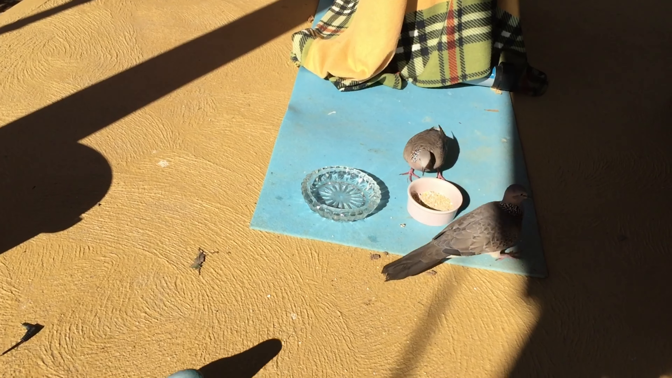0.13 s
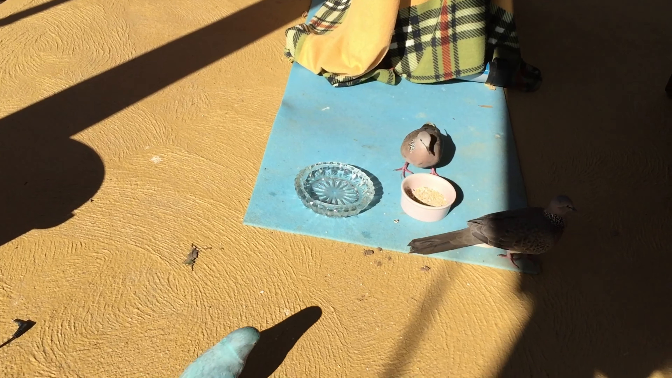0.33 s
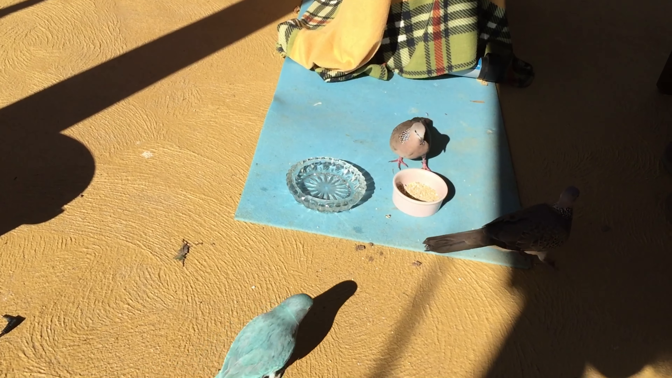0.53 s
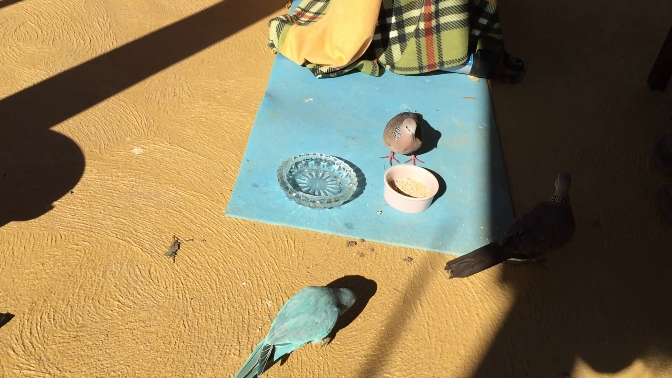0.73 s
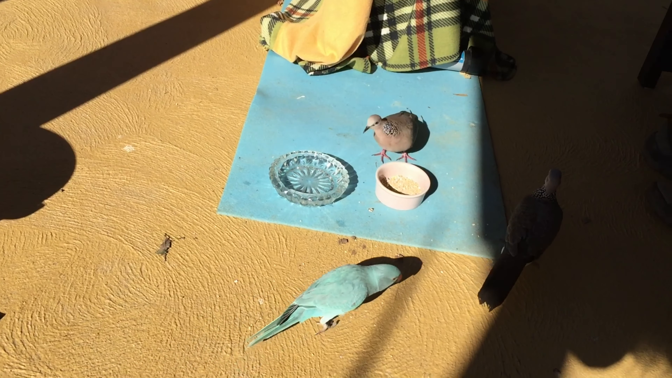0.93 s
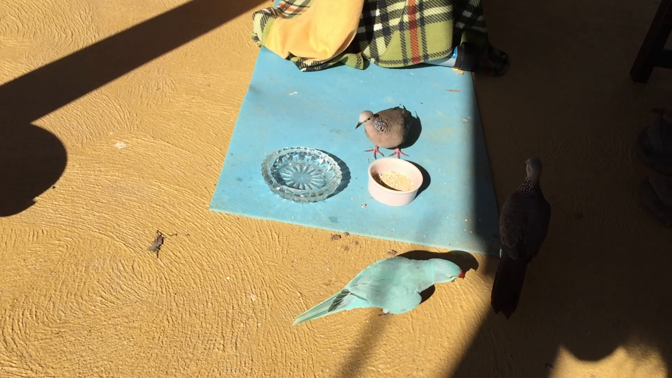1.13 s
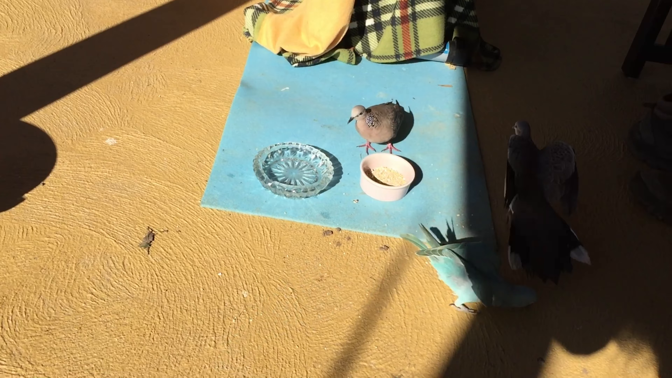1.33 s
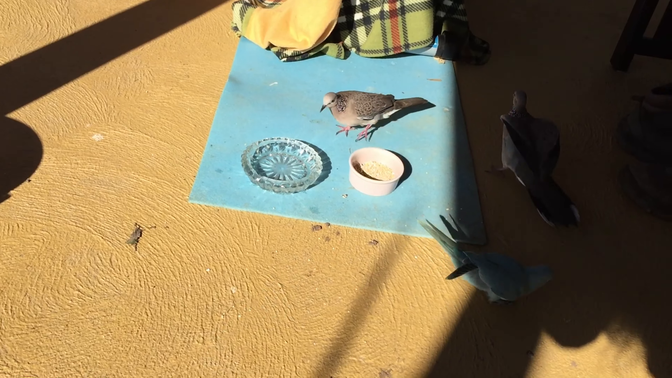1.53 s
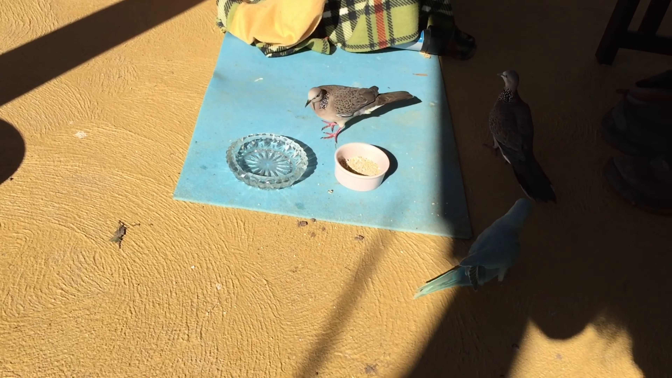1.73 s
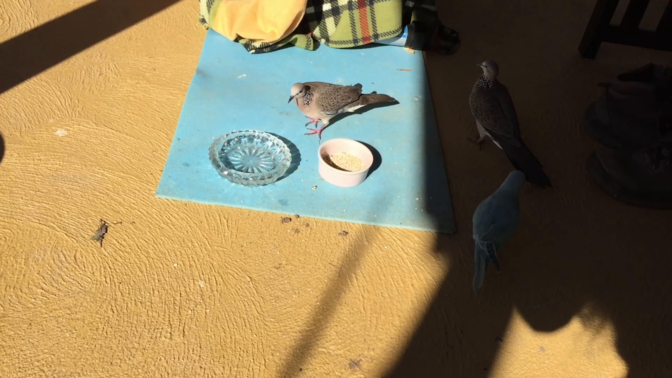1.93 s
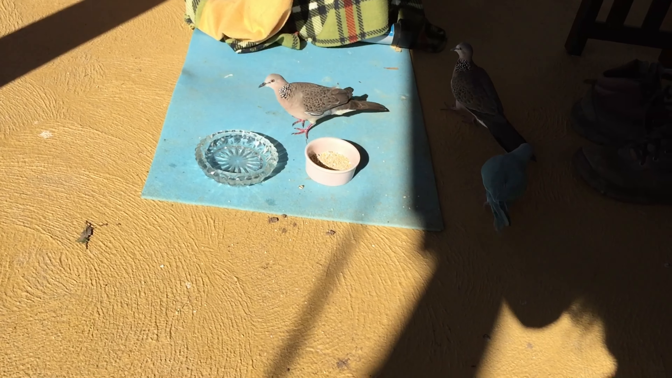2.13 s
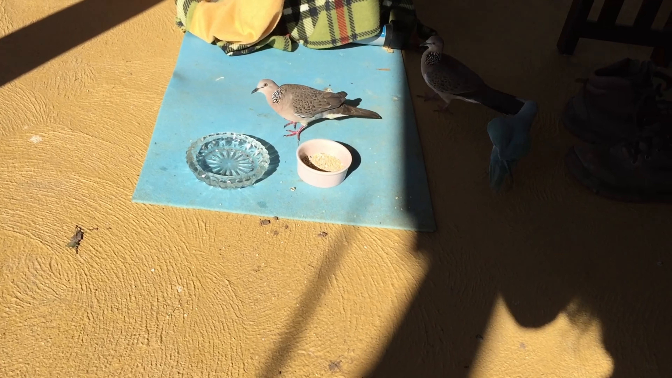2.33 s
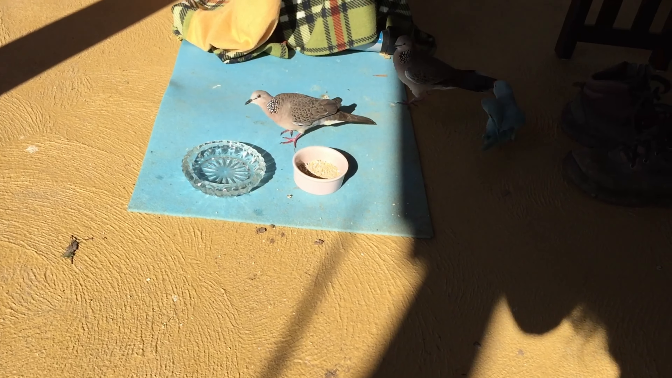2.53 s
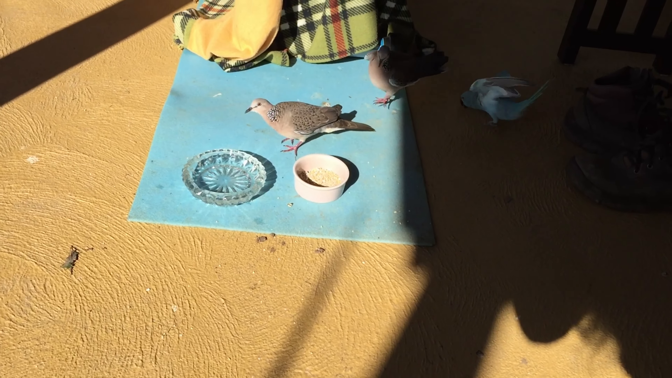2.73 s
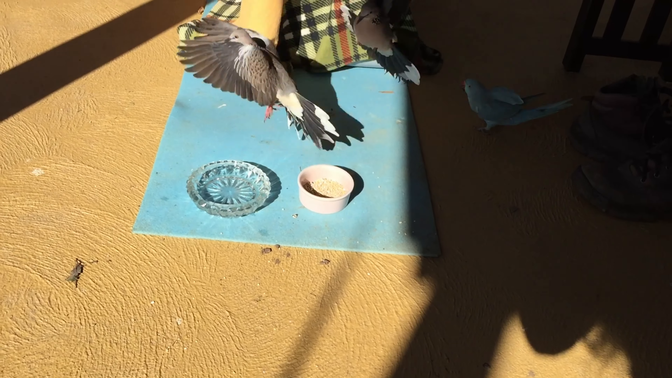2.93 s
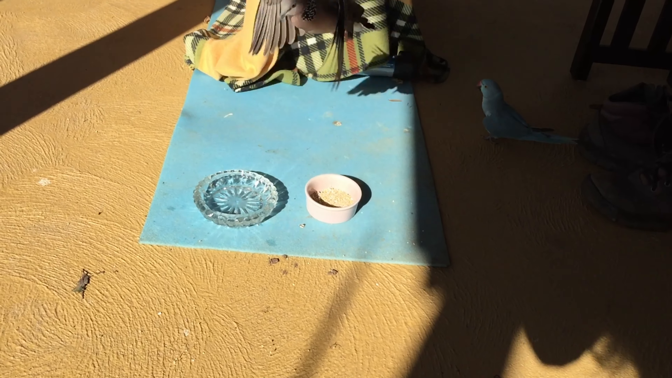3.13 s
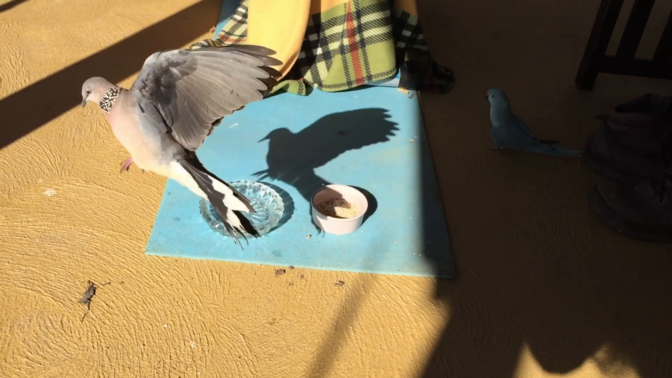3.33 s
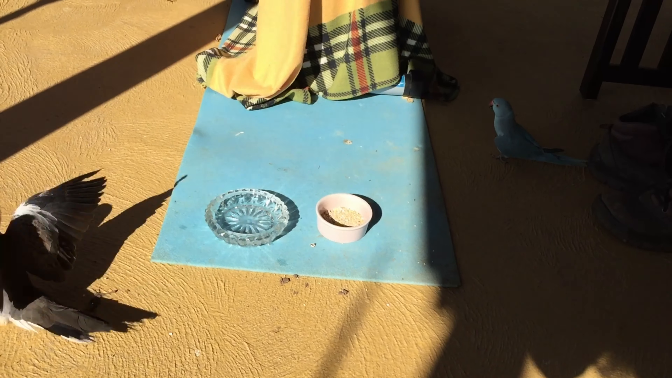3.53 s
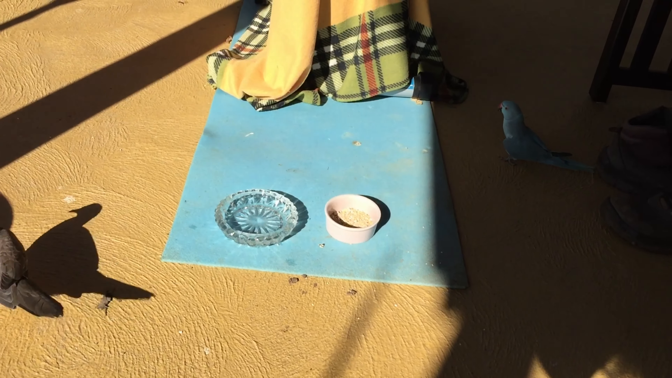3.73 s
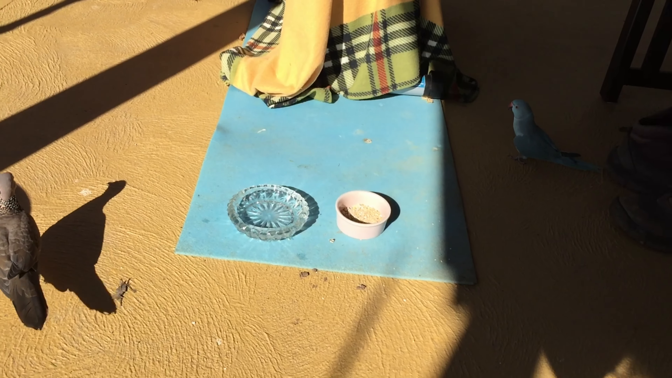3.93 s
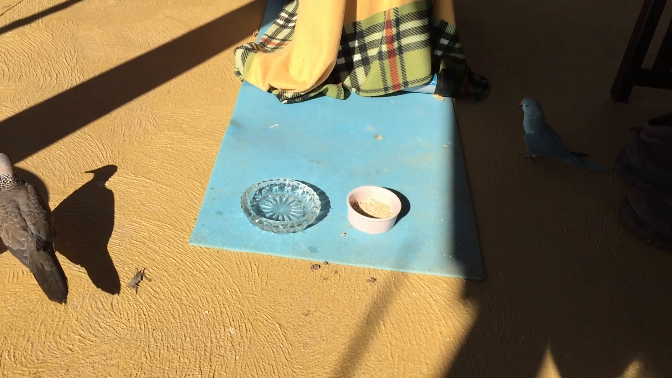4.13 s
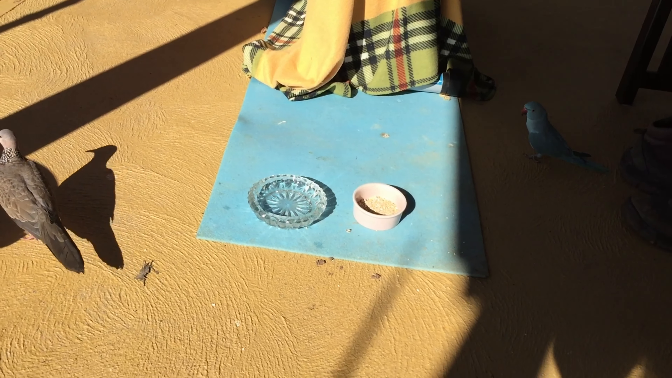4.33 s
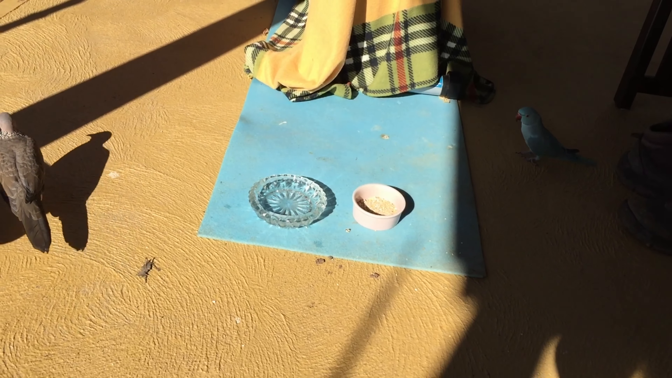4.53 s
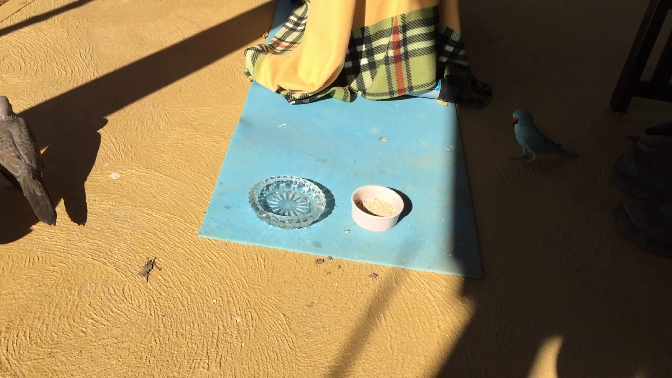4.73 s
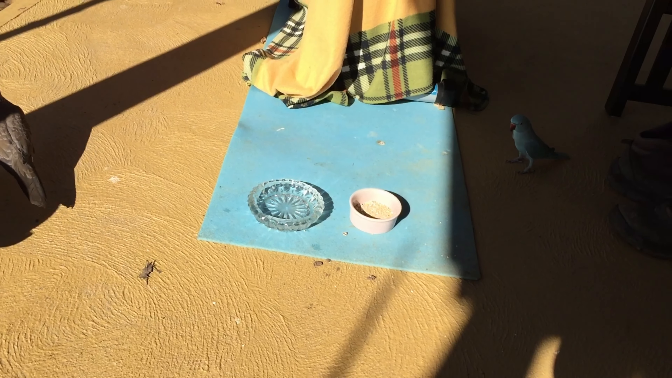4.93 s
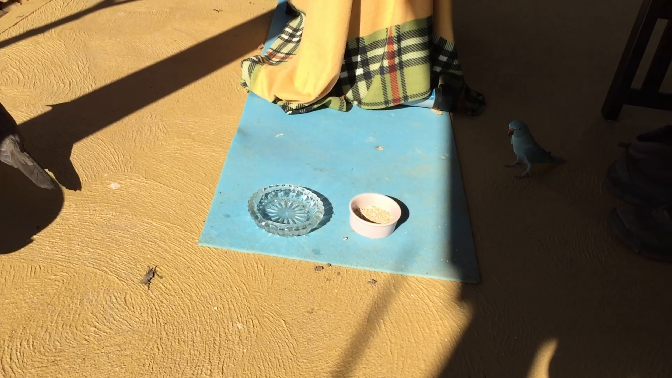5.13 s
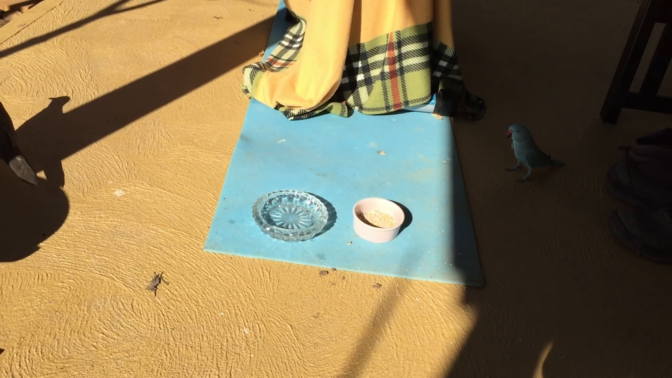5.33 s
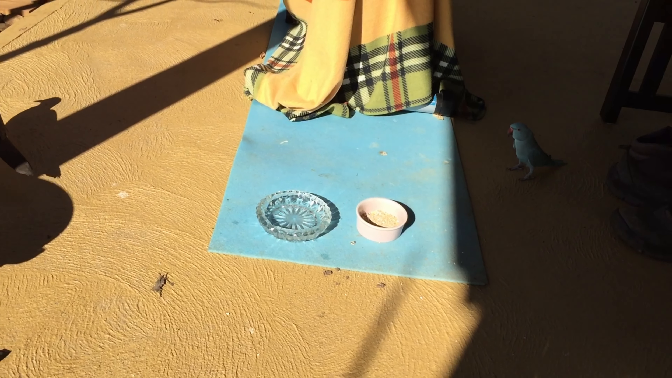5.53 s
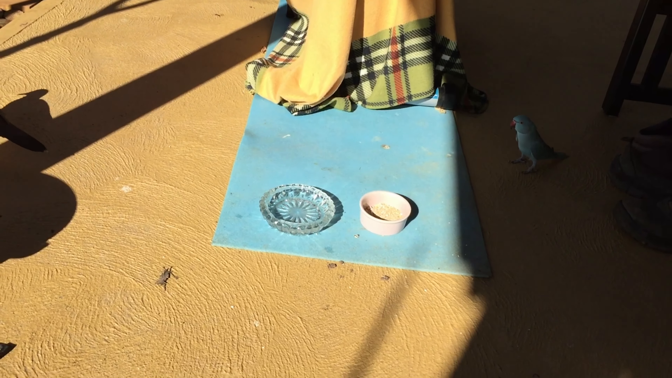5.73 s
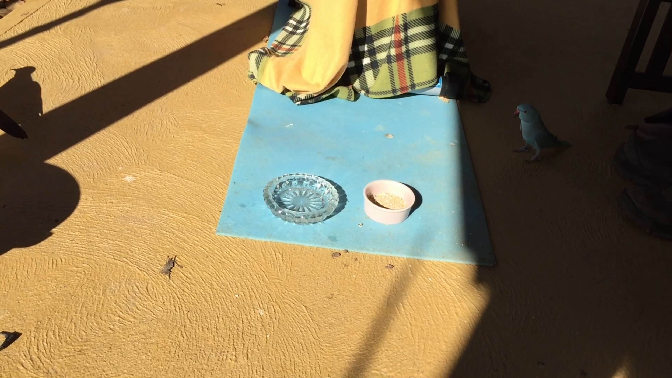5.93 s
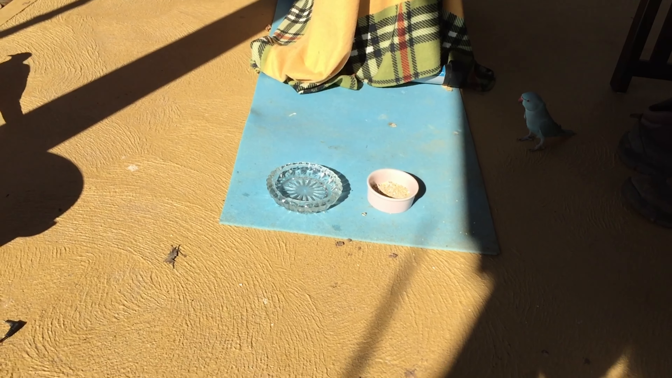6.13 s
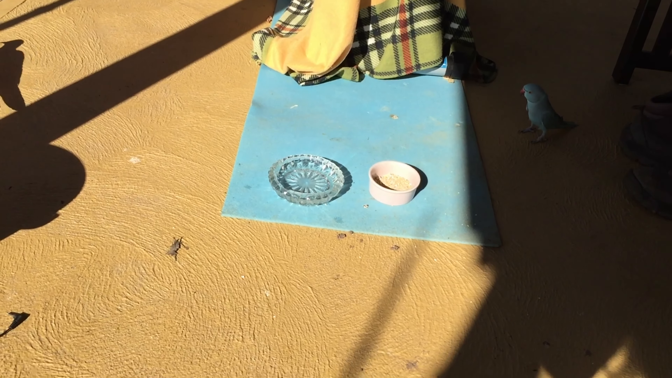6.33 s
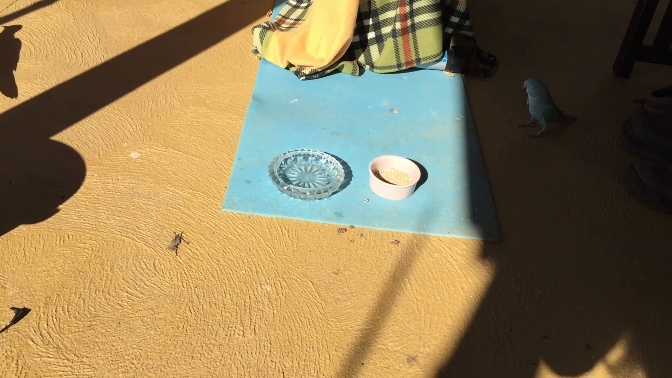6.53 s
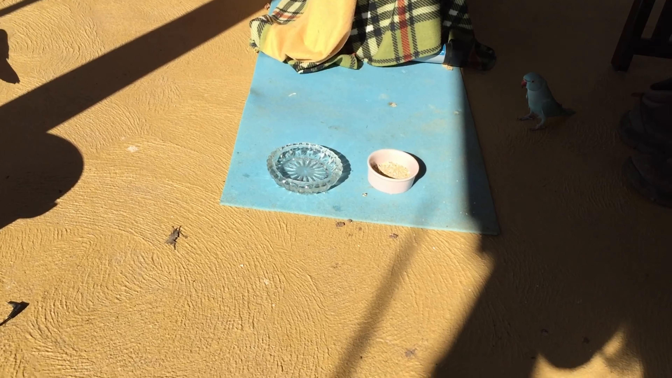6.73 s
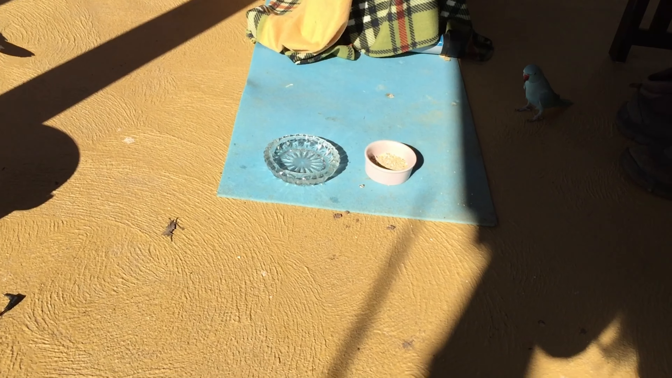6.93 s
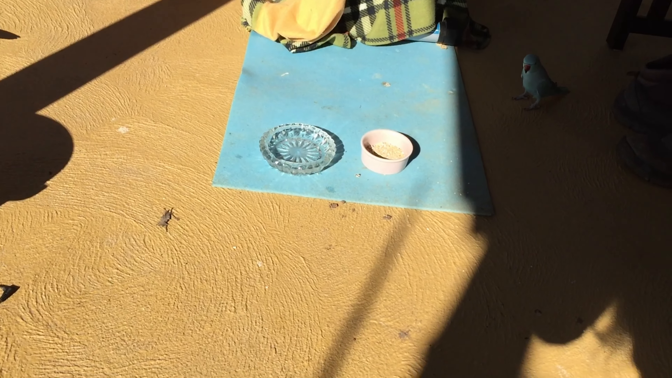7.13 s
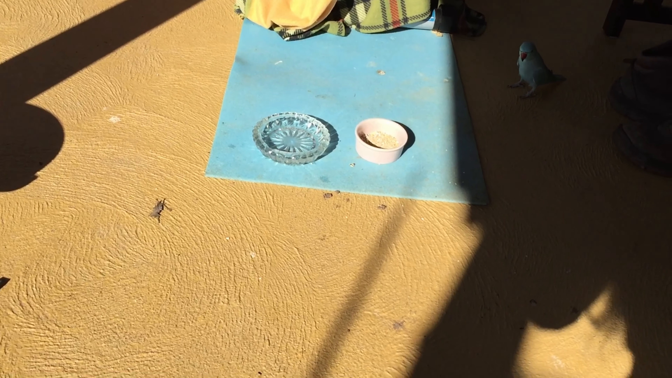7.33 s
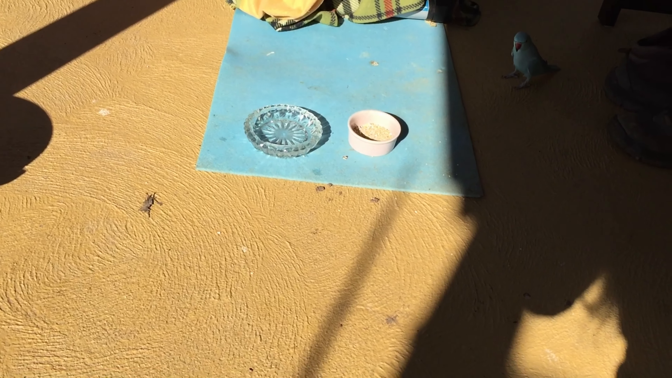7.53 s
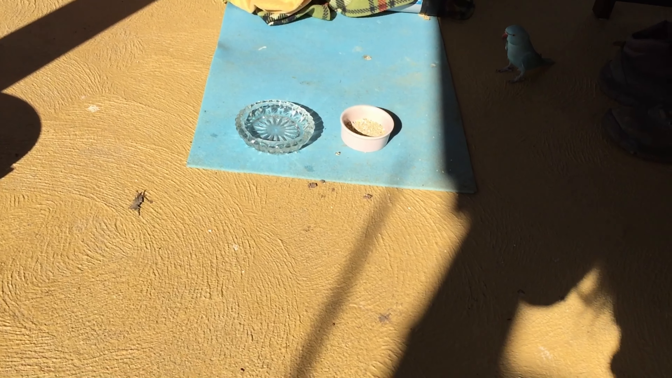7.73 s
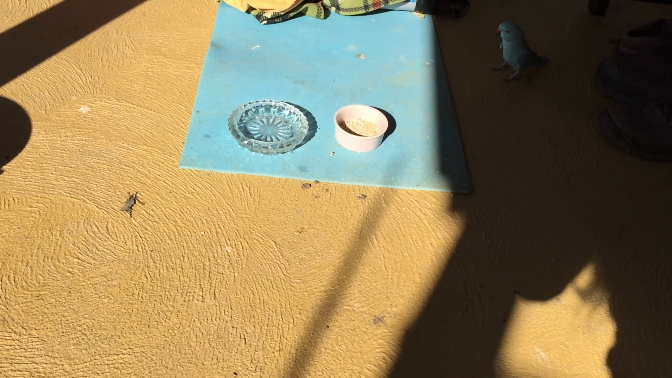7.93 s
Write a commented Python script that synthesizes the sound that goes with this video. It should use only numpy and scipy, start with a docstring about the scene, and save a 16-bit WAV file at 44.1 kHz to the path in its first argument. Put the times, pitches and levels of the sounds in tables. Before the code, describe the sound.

Quiet patio with distant traffic rumble and soft claw ticks; a wing flick, then loud slapping dove wings, a landing, and tiny far birds.

```python
"""A low rumble of distant traffic under the hiss of open air: shaped noise, heard from the first moment.
Over it, doves shuffle and tick at a feeding bowl on a walled backyard patio: swelling noise, gritty bursts.
Small birds chirp far off in narrow bands of noise. One dove flicks its wings, then two burst up with a
clatter of slaps, snaps, air puffs and gliding tones; one lands nearby and settles its feathers.
Discrete echoes and a diffuse tail add the walls."""
import sys
import numpy as np
from scipy import signal
from scipy.fft import rfft, irfft
from scipy.io import wavfile
from scipy.ndimage import uniform_filter1d

SR = 44100
rng = np.random.default_rng(int(sys.argv[2]) if len(sys.argv) > 2 else 0)


def dump_mix(stems):
    """Bounce the given channels to the path in sys.argv[1] as a 16-bit WAV at rate SR."""
    frames = np.atleast_2d(stems).T  # one column per channel
    limited = np.clip(frames, -1, 1)  # hard clip at full scale
    pcm = np.round(limited * 32767).astype(np.int16)
    wavfile.write(sys.argv[1], SR, pcm)


N = 356107
TIME = np.arange(N) / SR

# Spectrum of the traffic rumble: (frequency [Hz], relative level [dB])
RUMBLE_SPECTRUM = [(12, -71), (20, -31), (27, -49), (35, -26), (45, -7.5), (70, -1.5), (88, -4), (125, -10),
                   (189, -18.5), (239, -24.5), (400, -37.5), (520, -53), (880, -120)]
# Mean course of the traffic: (time [s], level [dB])
RUMBLE_LEVEL = [(0, -44.5), (.7, -43.5), (1.05, -45.5), (2.3, -45), (3.3, -42.5), (4.6, -45), (7.1, -43.5),
                (7.75, -49.5), (8.07, -46)]
# Spectrum of the hiss of open air: (frequency [Hz], relative level [dB])
AIR_SPECTRUM = [(100, -4.5), (250, 2), (400, 2), (620, -1), (950, 2.5), (1300, -4.5), (1700, -3.5),
                (2600, -10.5), (4000, -16.5), (7000, -20), (9200, -24.5), (10400, -30), (12000, -24),
                (16000, -27.5)]
# Course of the open air, easing toward the end: (time [s], level [dB])
AIR_LEVEL = [(0, -56), (5.5, -56.5), (8.07, -59)]
# Soft shuffle of the walking birds: (time [s], level [dB])
SHUFFLE_LEVEL = [(0, -66.5), (1.3, -57), (2.05, -56.5), (2.9, -51), (3.7, -56.5), (3.95, -47),
                 (4.17, -61.5), (5.2, -63.5)]
# Fine rustle of their feathers: (time [s], level [dB])
PREEN_LEVEL = [(.3, -62.5), (1.25, -69.5), (1.549, -60.5), (2.05, -74.5), (2.7, -64.5), (3.4, -52),
               (4.5, -68.5), (8.07, -67)]
# Wing beats and feather flicks: (peak time [s], fall [s], swish of air [dB], rustle of feathers [dB])
STROKES = [(0.058, 0.012, -68, -36), (1.475, 0.05, -47, -41.5), (1.591, 0.042, -38, -64),
           (2.405, 0.064, -40, -73), (2.987, 0.046, -42.5, -39.5), (3.058, 0.028, -23.5, -28),
           (3.154, 0.035, -26, -25.5), (3.233, 0.036, -33, -34), (3.359, 0.04, -41, -41.5),
           (3.395, 0.018, -38.5, -42.5), (3.508, 0.091, -50, -57.5), (3.632, 0.019, -41.5, -44.5),
           (3.9, 0.058, -63, -64), (4.083, 0.026, -40.5, -55.5), (4.8, .04, -53, -58.5),
           (7.908, 0.013, -65, -45.5)]
# Spectrum of air swept by a wing: (frequency [Hz], relative level [dB])
SWISH_SPECTRUM = [(60, -35.5), (150, -5), (330, -8), (520, -9), (750, -5), (1150, -4.5), (1700, -8),
                  (2400, -16.5), (3200, -24.5), (6000, -29.5), (16000, -47)]
# Spectrum of feathers rubbing: (frequency [Hz], relative level [dB])
RUSTLE_SPECTRUM = [(300, -52), (1500, -4), (2450, 5.5), (2850, 2), (3500, 2), (5000, -0.5), (7000, -1.5),
                   (9000, -2), (10400, -6.5), (11800, -4.5), (16000, -12)]
# Clearest claw and beak strikes:
# (time [s], level [dB], centre [Hz], decay [s], width as ratio of band edge to centre [1])
TICKS = [(.159, -40.5, 5500, 0.0061, 1.35), (.314, -48, 6070, 0.0079, 1.28),
         (.555, -41.5, 4160, .0048, 1.27), (0.889, -50.5, 6260, .009, 1.27),
         (.951, -53.5, 4180, 0.012, 1.1), (1.7875, -40, 4200, 0.0046, 1.3),
         (2.612, -36, 6250, 0.0062, 1.58), (2.761, -37, 4200, 0.011, 1.23),
         (2.8628, -39.5, 4000, 0.0024, 3.6), (2.941, -31, 4500, 0.0043, 1.2), (3.488, -44, 4400, 0.0025, 1),
         (3.941, -41, 4000, 0.0053, 2.3), (4.147, -42.5, 8200, .0065, 1.4), (4.332, -54, 10000, .003, 1.4),
         (7.617, -47.5, 6500, 0.0054, 1.37), (7.906, -38.5, 7050, 0.0042, 1.22)]
# Nearest of the far small birds: (time [s], level [dB], pitch [Hz])
CHIRPS = [(.735, -59, 3000), (1.134, -52, 2150), (2.593, -55, 2800), (4.602, -54, 2050),
          (5.237, -54.5, 2410), (5.343, -57, 3980), (5.617, -53, 3390), (5.779, -48, 2720),
          (6.008, -58, 5150), (6.398, -53, 2650), (6.74, -55, 2270), (6.776, -48, 2670),
          (6.92, -54.5, 4980), (7.069, -52.5, 2570), (7.43, -59, 6000), (7.574, -58, 2440),
          (7.875, -55, 3380), (7.898, -54, 2260)]
# Feathers and tails sliding past each other: (peak time [s], level [dB], centre [Hz], fall [s])
SLIDES = [(.19, -53, 4700, 0.046), (.208, -48, 11200, .018), (0.482, -47.5, 6100, 0.0096),
          (.52, -56.5, 4500, 0.1), (.72, -59.5, 4230, 0.034), (1.552, -38, 4800, 0.0077),
          (1.587, -36, 2490, 0.022), (1.594, -42, 4160, 0.017), (1.679, -48.5, 4150, 0.018),
          (2.19, -56, 3730, .025), (2.41, -46, 1520, 0.015), (3.0, -43, 4950, 0.029),
          (3.064, -31, 1590, 0.015), (3.15, -26, 1690, 0.011), (4.079, -43.5, 1250, 0.013)]
# Wing tips striking: (time [s], level of first quill [dB], quills that meet [count], brightness [0-1])
CLAPS = [(1.4617, -16.5, 2, 0.28), (1.4938, -34, 2, 0.3), (1.588, -26.5, 2, 0), (2.397, -34, 2, 0.16),
         (2.984, -32, 2, 0.35), (3.0444, -22, 2, 0.7), (3.065, -13, 2, 0.67), (3.1297, -8.5, 3, 0.7),
         (3.1324, -4.5, 3, 1), (3.166, -30, 2, 0.8)]
# Air pushed onto the microphone: (time [s], level [dB], frequency [Hz])
PUFFS = [(3.063, -16.5, 290), (3.1657, -18, 216), (3.171, -21, 84), (3.185, -25.5, 130)]
# Stiff flight feathers singing on a downstroke:
# (peak time [s], level [dB], pitch [Hz], half length [s])
WHISTLES = [(3.072, -21.5, 1150, 0.0033), (3.108, -31, 956, 0.0034), (3.145, -24.5, 2420, 0.0073),
            (3.231, -20, 1264, 0.0037), (3.302, -36.5, 1280, 0.0033)]
# Reflections from the ground and near walls: (delay [s], relative gain [1])
ECHOES = [(.0035, 0.46), (0.011, .16), (.0205, .17), (.0305, .11)]
# Decay of the diffuse field: (frequency [Hz], time to fall 60 dB [s])
PATIO_DECAY = [(100, 0.34), (1100, 0.42), (4000, 0.37), (9000, 0.21), (16000, 0.51)]

LUMP_DB, LUMPS_PER_S = 1.0, 9  # unevenness of the traffic
RISE_S, RISE_PER_FALL = 0.0053, 0.28  # a long stroke swells a little more slowly
BUFFET_DB = -21.5  # low draught on the microphone, against the swish
# After every clap the feathers shiver; levels are against the clap
SHIVER_LAG_S, SHIVER_RISE_S, SHIVER_FALL_S = 0.003, 0.00064, 0.0055
SHIVER_SWISH_DB, SHIVER_RUSTLE_DB = -15.5, -17  # the rustle is also weaker after a dull clap
# Fainter footsteps, which end at WALK_END_S
WALK_END_S, STEPS_PER_S, STEP_DECAY_S = 4.5, 7, 0.013
STEP_OVER_PREEN_DB, STEP_SPREAD_DB = 11, 3.5
STEP_HZ, STEP_OCTAVES, STEP_WIDTH = 5800, 0.59, 1.13
# The rest of the flock
FLOCK_DB, FLOCK_SPREAD_DB, FLOCK_DB_PER_OCTAVE = -60.5, 0.2, -3
FLOCK_LOW_HZ, FLOCK_OCTAVES = 2133, 1.706
SLIDE_RISE_SHARE = 0.72  # rise time over fall time
EDGE_HZ = 15950


def amp(db):
    """Level to amplitude: 20 dB is a factor of ten."""
    return 10 ** (np.asarray(db) / 20)


def unit(x):
    """Normalization to a root-mean-square of one."""
    return x / np.sqrt(np.mean(x ** 2) + 1e-20)


def read(points, hz):
    """Interpolation of a spectrum on a logarithmic frequency axis."""
    f, value = np.transpose(points)
    return np.interp(np.log(hz + 1), np.log(f + 1), value)


def level(curve):
    """Interpolation of a level curve, in dB, to a gain for every sample."""
    return amp(np.interp(TIME, *np.transpose(curve)))


def add(mix, s, sound):
    """Superposition: pressures add from time s onward."""
    part = mix[max(round(s * SR), 0):][:len(sound)]
    part += sound[:len(part)]


def colour(x, spectrum, size=4096):
    """Minimum-phase filtering: phase follows from log gain by Hilbert transform; unit filter energy."""
    log_gain = np.log(amp(read(spectrum, abs(np.fft.fftfreq(size, 1 / SR)))))
    response = np.exp(np.conj(signal.hilbert(log_gain)))
    taps = np.fft.ifft(response).real[:size // 2]
    return signal.oaconvolve(x, taps / np.linalg.norm(taps))[:len(x)]


def band(x, lo_hz, hi_hz, order=2):
    """Band-pass filtering: a Butterworth response keeps one region of the spectrum."""
    edges = [lo_hz, min(hi_hz, SR / 2.1)]
    sos = signal.butter(order, edges, "band", fs=SR, output="sos")
    return signal.sosfilt(sos, x)


def drift(per_s):
    """Slow random variation: normal random knots joined by straight lines."""
    knots = np.arange(0, N / SR + 1, 1 / per_s)
    return np.interp(TIME, knots, rng.standard_normal(len(knots)))


def grainy(grain_db, per_s):
    """Stick-slip texture: noise in small clumps, as barbs slip over each other."""
    return unit(rng.standard_normal(N) * amp(grain_db * drift(per_s)))


def patchy(x, depth_db, size):
    """Time-frequency modulation: narrow bands swell and fade on their own."""
    z = signal.stft(x, SR, nperseg=size)[2]
    chance = rng.standard_normal(z.shape)
    smooth_hz = uniform_filter1d(chance, 3, 0)
    patches = unit(uniform_filter1d(smooth_hz, 3, 1))
    return unit(signal.istft(z * amp(depth_db * patches), SR, nperseg=size)[1][:N])


def swell(s, rise, fall):
    """Exponential growth and decay: the samples around a moment, and the gain that peaks there."""
    near = slice(max(int((s - .3) * SR), 0), int((s + .5) * SR))
    t = TIME[near] - s
    return near, np.exp(-np.maximum(-t / rise, t / fall))


def background():
    """Broadband ambience: lumpy low traffic rumble adds to the hiss of open air."""
    hz = np.fft.rfftfreq(N, 1 / SR)
    rumble = unit(irfft(rfft(rng.standard_normal(N)) * amp(read(RUMBLE_SPECTRUM, hz)), N))
    lumps = amp(LUMP_DB * drift(LUMPS_PER_S))
    air = colour(patchy(grainy(0.1, 25), depth_db=2.4, size=1024), AIR_SPECTRUM)
    return rumble * level(RUMBLE_LEVEL) * lumps + air * level(AIR_LEVEL)


def wings(draught_lo_hz=50, draught_hi_hz=170):
    """Turbulence and friction: strokes and shivers give a dull swish, bright rustle and low draught."""
    swish_power, rustle_power = level(SHUFFLE_LEVEL) ** 2, level(PREEN_LEVEL) ** 2
    beats = [(s, RISE_S + RISE_PER_FALL * fall, fall, swish_db, rustle_db)
             for s, fall, swish_db, rustle_db in STROKES]
    shivers = []
    for s, db, _, bright in CLAPS:
        rustle_db = db + SHIVER_RUSTLE_DB + 10 * np.log10(max(bright, .01))
        shivers.append((s + SHIVER_LAG_S, SHIVER_RISE_S, SHIVER_FALL_S, db + SHIVER_SWISH_DB, rustle_db))
    for s, rise, fall, swish_db, rustle_db in beats + shivers:
        near, gain = swell(s, rise, fall)
        swish_power[near] += (amp(swish_db) * gain) ** 2
        rustle_power[near] += (amp(rustle_db) * gain) ** 2
    air = patchy(grainy(3.7, 350), depth_db=5.5, size=1024)
    barbs = patchy(grainy(2.7, 900), depth_db=3.0, size=512)
    low_noise = unit(band(rng.standard_normal(N), draught_lo_hz, draught_hi_hz))
    swish = colour(np.sqrt(swish_power) * air, SWISH_SPECTRUM)
    rustle = colour(np.sqrt(rustle_power) * barbs, RUSTLE_SPECTRUM)
    draught = amp(BUFFET_DB) * np.sqrt(swish_power) * low_noise
    return swish + rustle + draught


def footsteps():
    """Random point process: faint ticks while the birds walk, stronger while they are busy."""
    count, busy = round(STEPS_PER_S * WALK_END_S), np.transpose(PREEN_LEVEL)
    steps = []
    for s in rng.uniform(0, WALK_END_S, count):
        loud, high = rng.standard_normal(2)
        db = np.interp(s, *busy) + STEP_OVER_PREEN_DB + STEP_SPREAD_DB * loud
        steps.append((s, db, STEP_HZ * 2 ** (STEP_OCTAVES * high), STEP_DECAY_S, STEP_WIDTH))
    return steps


def ticks(knock_db=-15, attack_s=0.00053):
    """Impact with friction: a short gritty scratch over a faint knock of the ground."""
    out, t = np.zeros(N), np.arange(3000) / SR
    grit = grainy(2.9, 1500)
    for s, db, hz, decay, width in TICKS + footsteps():
        noise = grit[int(s * SR):][:len(t)]
        width = max(width, 1.05)
        scratch = unit(band(noise, hz / width, hz * width))
        knock = amp(knock_db) * unit(band(noise, 714, 2800))
        envelope = (1 - np.exp(-t / attack_s)) * np.exp(-t / decay)
        add(out, s, amp(db) * (scratch + knock) * envelope)
    return out


def flock(count=60):
    """Propagation loss: faint chips at random moments and pitches; the high ones carry less far."""
    when, high = rng.random((2, count))
    times = .05 + when * (N / SR - .15)
    octaves = FLOCK_OCTAVES * high
    db = FLOCK_DB + FLOCK_DB_PER_OCTAVE * octaves + FLOCK_SPREAD_DB * rng.standard_normal(count)
    return list(zip(times, db, FLOCK_LOW_HZ * 2 ** octaves))


def chirps(half_s=0.0082, rasp_hz=240):
    """Narrow-band noise: brief raspy chips, with the rest of the flock twittering faintly behind."""
    out, t = np.zeros(N), np.arange(-.04, .04, 1 / SR)
    rasp = rng.standard_normal(N)
    for s, db, hz in CHIRPS + flock():
        noise = rasp[int(s * SR):][:len(t)]
        buzz = signal.hilbert(band(noise, hz - rasp_hz, hz + rasp_hz))
        voice = buzz.real / np.sqrt(abs(buzz) + 1e-9)  # the pitch jumps about more than the strength
        add(out, s + t[0], amp(db) * unit(voice) * np.exp(-(t / half_s) ** 2))
    return out


def slides(width=1.266):
    """Sliding friction: barbs passing at an even speed hiss in one narrow band."""
    out, grit = np.zeros(N), grainy(4.3, 540)
    for s, db, hz, fall in SLIDES:
        near, gain = swell(s, SLIDE_RISE_SHARE * fall, fall)
        out[near] += amp(db) * gain * unit(band(grit[near], hz / width, hz * width))
    return out


def claps(quill_gap_s=0.00065, slap_hz=1150, slap_decay_s=0.00053, snap_decay_s=0.00063):
    """Successive impacts: quills meet one after another, each with a hollow slap and a sharp snap."""
    out, t = np.zeros(N), np.arange(600) / SR
    slap = np.sin(2 * np.pi * slap_hz * t) * np.sqrt(t) * np.exp(-t / slap_decay_s)
    slap /= abs(slap).max()
    for s, db, quills, bright in CLAPS:
        bright = np.clip(bright, 0, 1)
        for k, noise in enumerate(rng.standard_normal((round(quills), len(t)))):
            snap = band(noise * np.exp(-t / snap_decay_s), 1200, 9100)
            crack = (1 - bright) * slap + np.sqrt(bright) * snap / abs(snap).max()
            uneven = 1 + .15 * noise[-1]
            add(out, s + k * quill_gap_s * uneven, amp(db - 2 * k) * crack)  # each quill 2 dB weaker
    return out


def puffs(cycles=0.84):
    """Near-field flow: one quick swing of pressure as a wing passes close."""
    out, t = np.zeros(N), np.arange(4000) / SR
    for s, db, hz in PUFFS:
        fade = np.exp(-(hz * t / cycles) ** 2)
        add(out, s, -amp(db) * np.sin(2 * np.pi * hz * t) * fade)
    return out


def whistles(glide=-7, waver=0.0544):
    """Edge tone: a feather sings for a few cycles and sinks (glide [octaves/s]) as the wing slows."""
    out, t = np.zeros(N), np.arange(-.03, .03, 1 / SR)
    wobble = drift(500)
    for s, db, hz, half in WHISTLES:
        pitch = hz * 2 ** (glide * t) * (1 + waver * wobble[int(s * SR):][:len(t)])
        tone = np.sqrt(2) * np.sin(2 * np.pi * np.cumsum(pitch) / SR)
        add(out, s + t[0], amp(db) * tone * np.exp(-(t / half) ** 2))
    return out


def echoes(x):
    """Specular reflection: the ground and the near walls throw the sound back once each."""
    out = np.zeros(N)
    for s, gain in ECHOES:
        add(out, s, gain * x)
    return out


def patio(x, build_s=0.0033):
    """Diffuse reverberation: a noise tail builds up, then decays at a rate set by frequency."""
    hz, t, z = signal.stft(rng.standard_normal(SR), SR, nperseg=256)
    decay = amp(-60 * t / read(PATIO_DECAY, hz)[:, None])
    z = z * decay * (1 - np.exp(-t / build_s))
    tail = signal.istft(z, SR, nperseg=256)[1]
    return signal.oaconvolve(x, tail / np.linalg.norm(tail))[:N]


def scene():
    """Direct-to-reflected ratio: close doves nearly dry, far birds with more of the patio's echo."""
    near = wings() + ticks() + slides() + claps() + puffs() + whistles()
    far = chirps()
    doves = near + amp(-12.5) * echoes(near) + amp(-10) * patio(near)
    small_birds = far + 1.3 * echoes(far) + .4 * patio(far)
    return (doves + small_birds + background())[None]


def record(dry):
    """Band limitation: a linear-phase low-pass filter removes the sound above EDGE_HZ."""
    taps = signal.firwin(511, EDGE_HZ, window=("kaiser", 9), fs=SR)
    return signal.oaconvolve(dry, taps[None], "same")


dry = scene()
out = record(dry)
dump_mix(out)
```